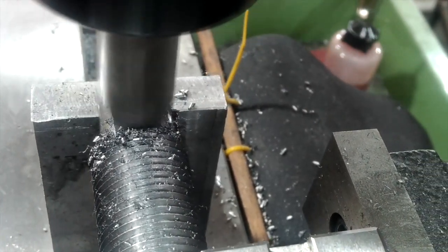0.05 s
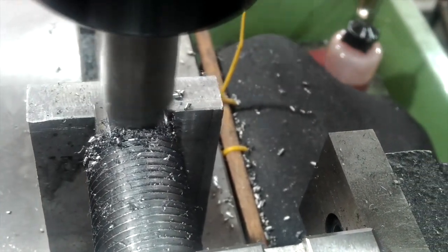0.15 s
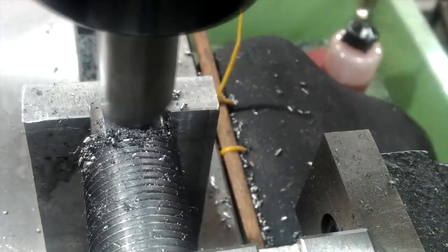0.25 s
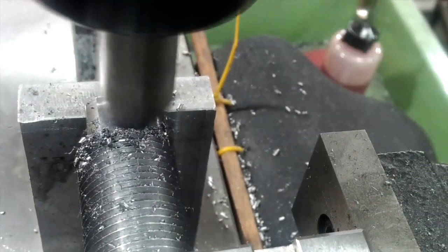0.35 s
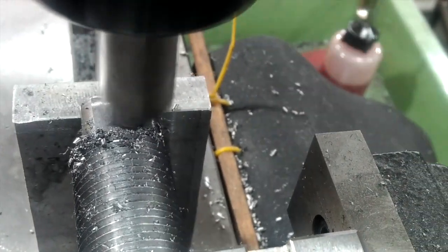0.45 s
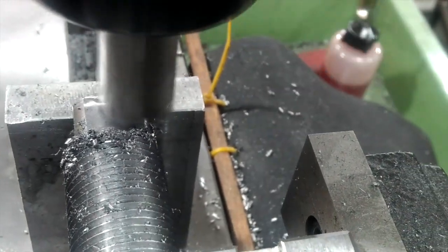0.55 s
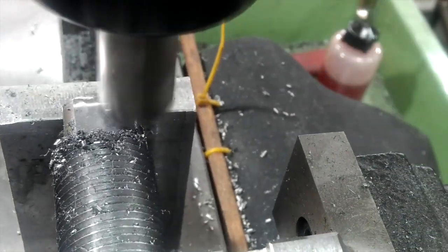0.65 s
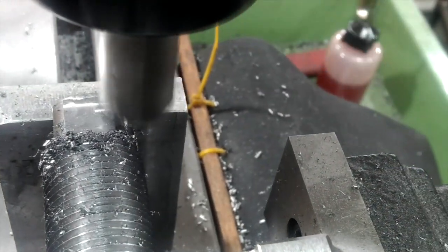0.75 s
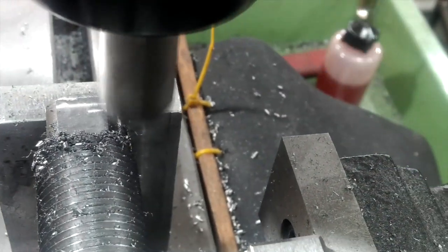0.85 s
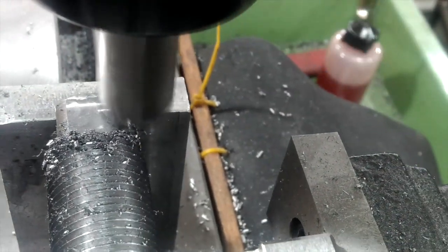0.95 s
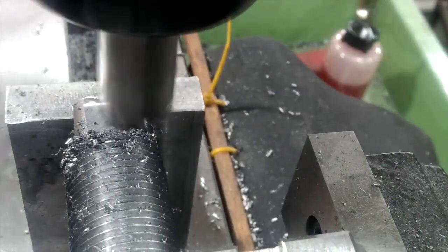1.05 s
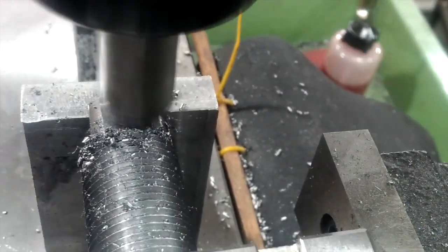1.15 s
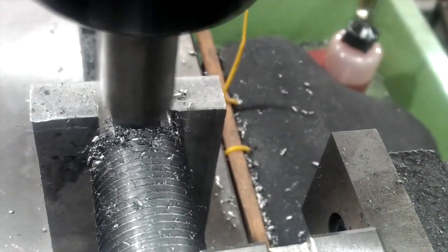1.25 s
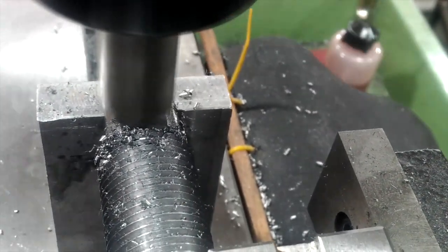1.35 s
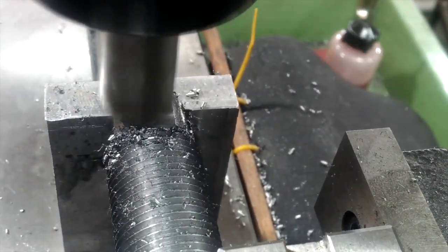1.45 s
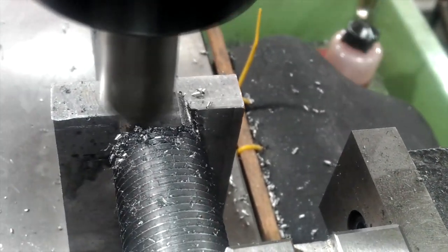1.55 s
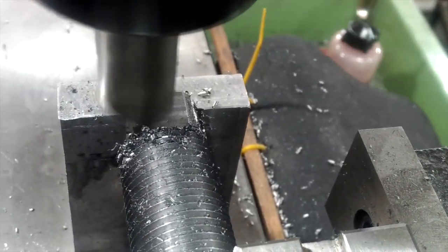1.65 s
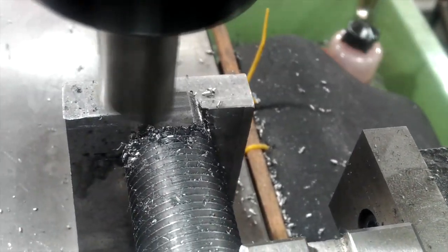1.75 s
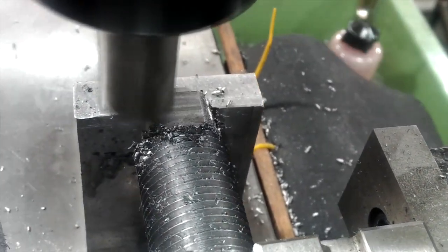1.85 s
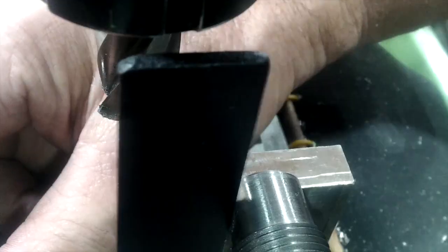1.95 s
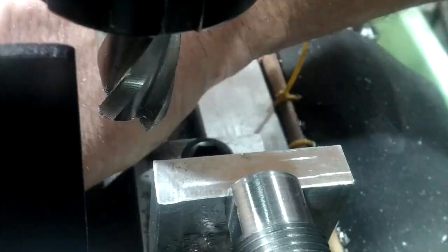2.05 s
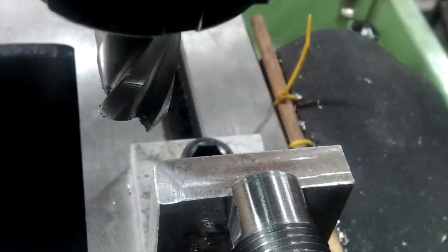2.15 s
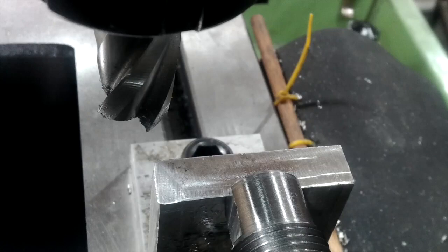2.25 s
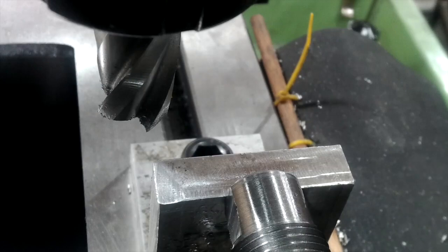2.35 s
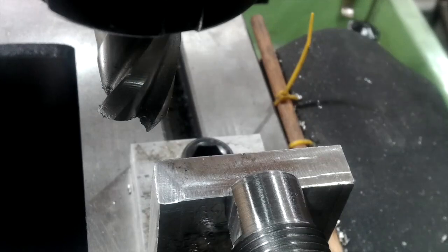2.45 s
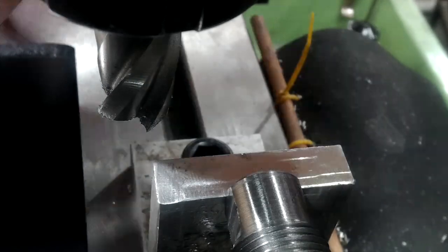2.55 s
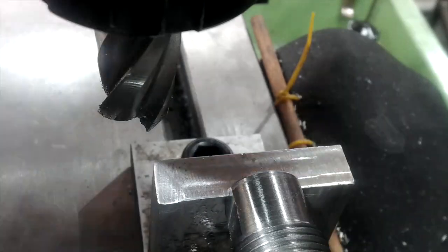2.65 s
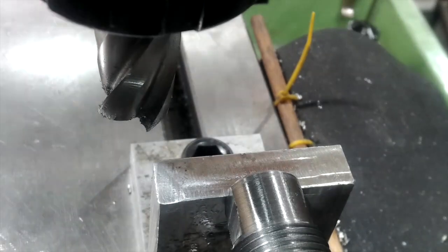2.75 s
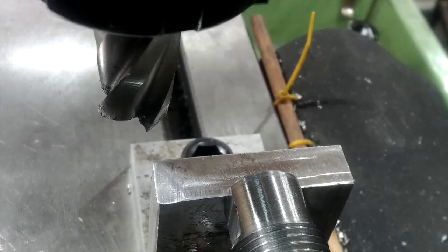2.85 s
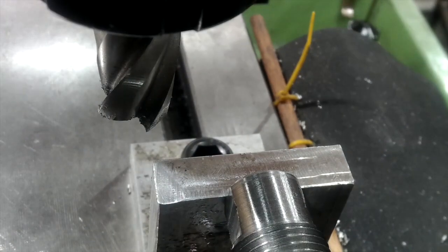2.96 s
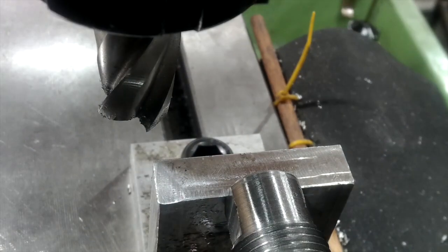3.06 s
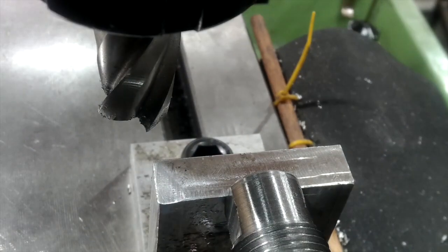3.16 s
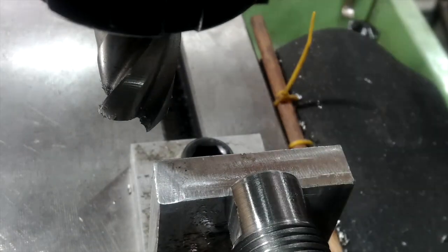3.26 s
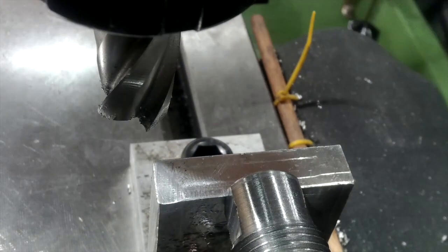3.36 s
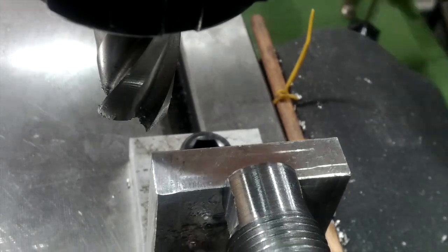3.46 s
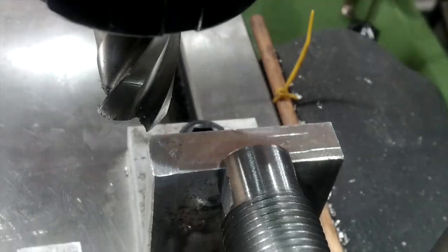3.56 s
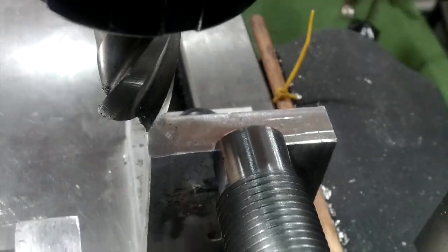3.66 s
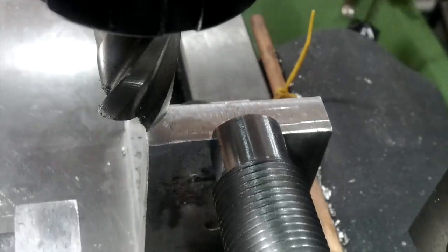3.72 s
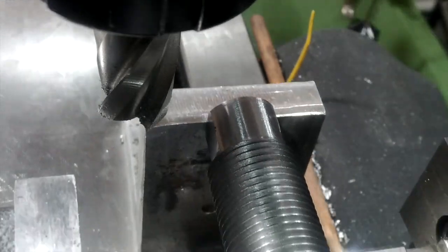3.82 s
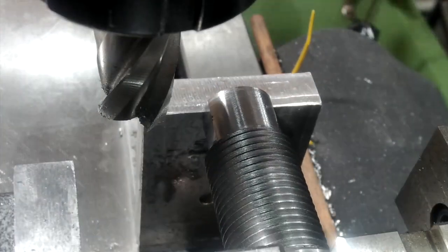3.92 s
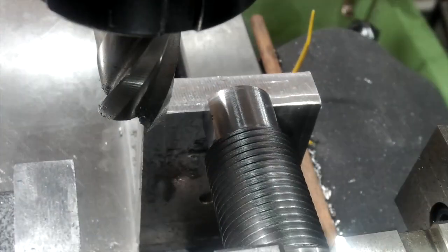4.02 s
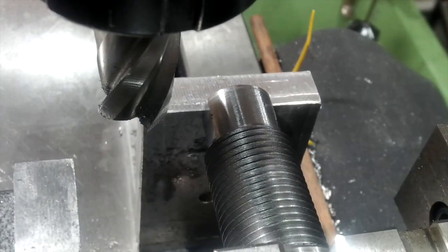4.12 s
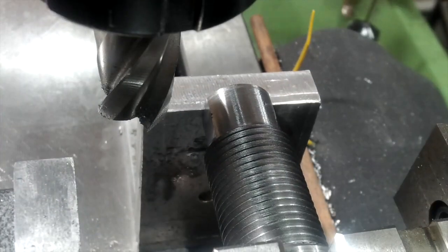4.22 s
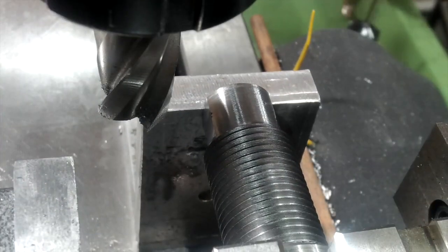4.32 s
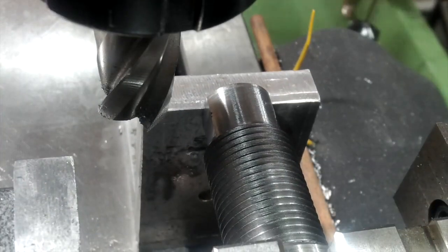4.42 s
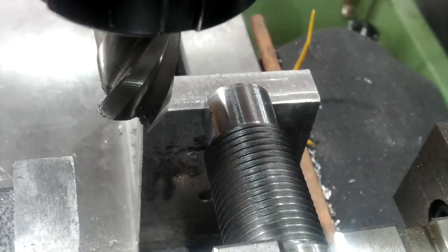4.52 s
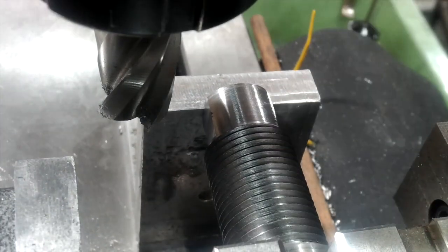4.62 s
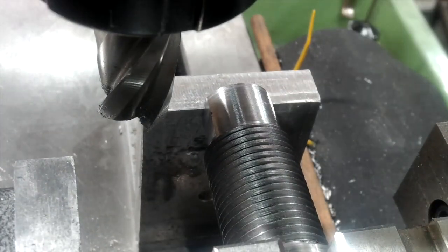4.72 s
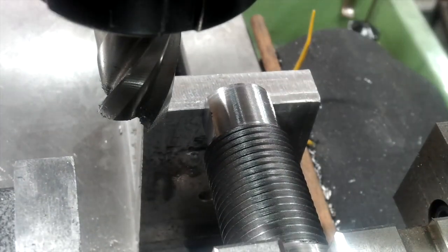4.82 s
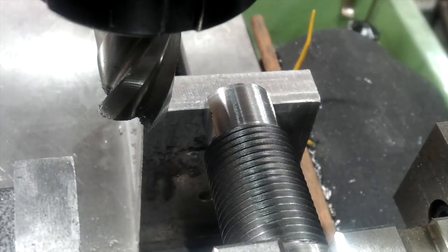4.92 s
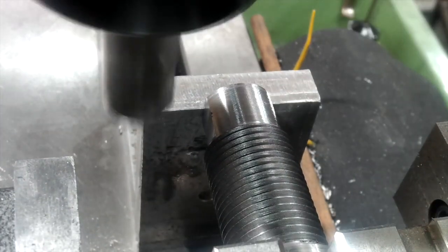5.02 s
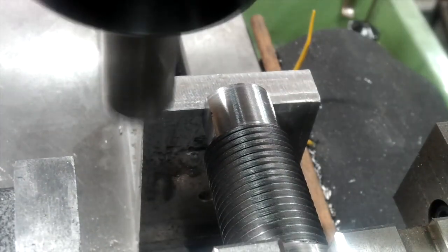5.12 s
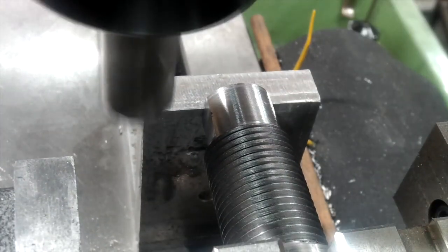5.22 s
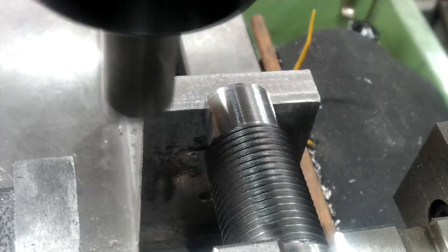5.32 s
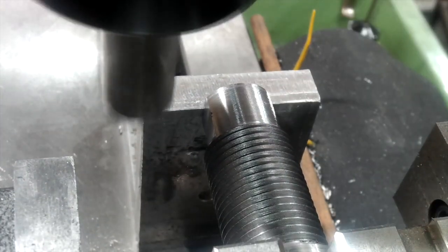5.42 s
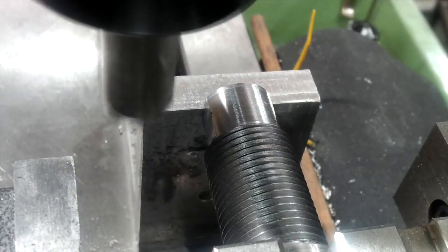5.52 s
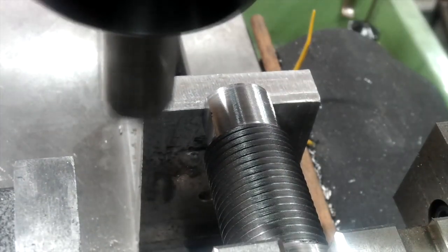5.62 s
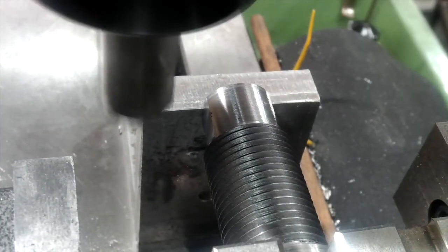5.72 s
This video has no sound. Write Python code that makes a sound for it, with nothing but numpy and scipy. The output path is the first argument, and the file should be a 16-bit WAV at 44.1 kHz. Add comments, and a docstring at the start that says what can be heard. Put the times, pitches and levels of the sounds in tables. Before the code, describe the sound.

Close workshop milling: hissing, buzzing cut over a steady hum, sudden drop to idle hum, gritty jog clicks, sharp switch snap, spindle running free.

```python
"""In a workshop, a small milling machine is heard close by. Rotating parts and the hum are sums of sines; the spindle
adds resonant noise, and the end mill takes two bites of metal as flute harmonics and grains of chip noise.
At 2 s every steady tone drops abruptly by a tenth, the spindle stands, and the cabinet hums over the shop's hiss.
The table is jogged in steps of filtered grains; a switch clacks and a contactor pulls in, both as struck decaying
modes; then the spindle runs again in air."""
import sys
import numpy as np
from scipy import signal
from scipy.fft import rfft, irfft
from scipy.io import wavfile
from scipy.ndimage import uniform_filter1d

SR = 44100
rng = np.random.default_rng(int(sys.argv[2]) if len(sys.argv) > 2 else 0)


def bounce(signal):
    """Save signal as a 16-bit WAV file at the path given by the first command-line argument."""
    frames = np.transpose(np.atleast_2d(signal))
    limited = np.clip(frames, -1, 1)
    pcm = np.round(limited * 32767).astype(np.int16)
    wavfile.write(sys.argv[1], SR, pcm)


N = 255019

CHANGE_S, START_S = 2.0015, 5.009   # the abrupt change; the spindle restarts
EARLY_PACE = 1.1083   # rate of machine time before the change; 1 afterwards
T = np.arange(N) / SR
EARLY, LATE = T < CHANGE_S, T >= START_S
PACE = np.where(EARLY, EARLY_PACE, 1)
CLOCK = np.cumsum(PACE) / SR   # machine time, s
HUM_HZ, FLUTE_HZ, FAN_HZ = 361.96, 69.31, 161.5   # fundamentals in machine time

# Shop hiss: f/Hz, spectral density/dB (relative)
SHOP_SPECTRUM = [(25, -21), (60, -26), (110, -5), (170, -3.5), (250, -4), (450, 0), (600, -8.5), (1000, -5),
                 (1700, -10), (2800, -8), (5500, -10.5), (8000, -10.5), (13000, -13.5), (15500, -19)]
# Faint humps in the hiss: f/Hz, width/Hz, lift/dB
SHOP_HUMPS = [(1920, 62, 9.5), (2930, 28, 14.5), (3920, 230, 3), (4940, 98, 9), (6500, 2100, 6.5)]
SHOP_DB = -72.5   # rms
# Swells of the bench rumble: t/s, level/dB
RUMBLE_SWELLS = [(.13, -86), (.38, -77), (3.19, -81), (3.43, -79), (3.68, -92), (3.87, -91)]
RUMBLE_EARLY_DB, RUMBLE_DB = -86.5, -91.5   # before and after the change
SWELL_S = 0.043   # time from the peak of a swell to 1/e

# Cabinet hum: multiple of HUM_HZ, then level/dB while milling, with spindle at rest, after restart
HUM_HARMONICS = [(1, -45.5, -48, -48), (2, -55.5, -61, -58.5), (3, -78, -92.5, -84.5), (4, -66.5, -73, -75),
                 (5, -73, -84.5, -80), (6, -59.5, -83, -66), (7, -70.5, -77.5, -78), (8, -65, -83, -71.5),
                 (9, -66, -88.5, -78), (11, -68, -84.5, -80), (12, -64, -91, -81), (13, -68, -89, -72.5),
                 (14, -56.5, -96, -69.5)]
# Low fan-like tone: multiple of FAN_HZ, level/dB
FAN_HARMONICS = [(1, -86.5), (3, -85)]

# Small knocks and ticks about the machine: t/s, level/dB, low f/Hz, high f/Hz
TICKS = [(.29, -59, 200, 400), (.355, -54, 400, 660), (.386, -60.5, 120, 400), (2.075, -70, 8500, 13000),
         (2.461, -68, 8500, 13000), (2.72, -69, 3000, 9000), (2.845, -70, 400, 650),
         (2.9, -61.5, 1000, 1350), (2.931, -59, 950, 3500), (3.04, -72, 1000, 1300),
         (3.106, -63, 2500, 7000), (3.156, -70, 500, 1300), (3.165, -72, 80, 300), (3.236, -68, 900, 3000),
         (3.3, -70, 950, 1350), (3.379, -62, 100, 600), (3.443, -58.5, 120, 1400),
         (3.455, -63, 5000, 13000), (3.465, -58.5, 990, 1390), (3.96, -62, 1400, 1900),
         (4.662, -63, 950, 7000), (4.72, -55.5, 1200, 9000), (5.418, -45, 3500, 13000),
         (5.558, -60, 10000, 14500), (5.6, -56, 6300, 10000)]
TICK_T60_S, TICK_CYCLES = 0.036, 9.2   # base decay; added decay as cycles of the bandwidth

# Ways rubbing through the move: f/Hz, spectral density/dB (relative)
SLIDE_SPECTRUM = [(600, -23), (1100, -2), (1600, -2), (3000, 0.5), (5000, -1.5), (7500, -3), (9000, -15),
                  (12000, -12), (15000, -22)]
SLIDE_FROM_S, SLIDE_TO_S, SLIDE_DB = 3.445, 3.985, -69.5
GRIT_PER_S, GRIT_MAX_DB = 25, -64   # fine ticks while sliding

# Jog steps of the table: t/s, level/dB at the start of the step
JOG_STEPS = [(3.549, -54), (3.608, -55), (3.662, -53.5), (3.713, -55.5), (3.773, -53), (3.823, -51.5),
             (3.877, -52), (3.932, -57.5)]
# Resonances of the table: f/Hz, width/Hz, level/dB
JOG_RESONANCES = [(1145, 60, -12.5), (2610, 130, -11), (2950, 270, 0), (3720, 110, -6), (5000, 330, 3.5),
                  (5500, 140, 1.5), (6240, 150, -8), (6720, 170, -1), (7270, 250, -5)]
JOG_S = 0.03   # nominal length of a step
JOG_DETUNE, JOG_FLARE_DB = .025, 5   # spread of relative detuning per step; spread of flare within it

# Switch, blow and bounces: t/s, level/dB
SWITCH_BLOWS = [(4.8093, -29.5), (4.8097, -27), (4.8135, -30)]
# Dying run of switch touches: start t/s, gap/s, first level/dB, change per touch/dB
SWITCH_CHATTER = (4.8108, .0012, -36, -1.14)
# Modes of the switch: f/Hz, level/dB, t60/s
SWITCH_MODES = [(240, -42, 0.01), (700, -48, .01), (1180, -19, 0.0096), (1740, -10, 0.0078),
                (2210, -6.5, 0.0049), (3140, -32, 0.0027), (4360, -9, 0.0091), (4560, -4.5, 0.0092),
                (5540, -5.5, 0.0075), (6740, -4, 0.01), (7000, -9, .007), (7860, -11, 0.011),
                (10300, -28, .005), (12600, -17, 0.0036), (14300, -25, .004)]
# Contactor touches: t/s, level/dB
CONTACTOR_BLOWS = [(5.0085, -58), (5.0097, -52), (5.0126, -48), (5.0198, -52), (5.024, -44)]
# Dying run of contactor touches: start t/s, gap/s, first level/dB, change per touch/dB
CONTACTOR_CHATTER = (5.0262, .003, -58, -2.5)
# Modes of the contactor: f/Hz, level/dB, t60/s
CONTACTOR_MODES = [(670, -21.5, .04), (1160, -37, 0.013), (2280, -9.5, 0.02), (3020, -6, 0.019),
                   (3740, -3, 0.014), (4600, -4.5, 0.0095), (5206, -6, .01), (6560, -3, 0.0086),
                   (8100, -3, 0.0051), (10500, -6, 0.01), (13000, -8, .008)]
# Low thud through the frame after the switch, two pings of the seating armature:
# t/s, f/Hz, level/dB, swell/s, t60/s
PINGS = [(4.811, 102.6, -72.5, .03, 0.98), (5.0106, 4720, -25, 0.00036, 0.0045),
         (5.0126, 5160, -19.5, 0.0013, 0.012)]

# Whine of spindle motor and bearings: f/Hz in machine time, level/dB while milling, level/dB after restart
WHINE = [(654, -75, -76), (794, -90, -82), (1597, -77, -85), (1735, -70, -75), (1803, -69, -73),
         (1862, -66, -73), (1887, -68, -72), (1903, -67, -72), (2011, -67, -95), (2292, -69, -88),
         (2320, -69, -76), (2352, -70, -86), (2522, -64, -72), (2702, -72, -80), (2965, -64, -74),
         (3246, -68, -80), (3331, -68, -76), (3472, -62, -74), (3690, -66, -76), (4860, -72, -76),
         (4888, -66, -75), (5000, -66, -73), (5041, -56, -65), (5401, -57, -69), (6121, -72, -78),
         (6664, -71, -78), (6845, -62, -71), (6944, -67, -78), (7574, -66, -80), (8297, -62, -84),
         (9022, -65, -79), (10090, -60, -79), (10376, -66, -77), (10415, -66, -75), (10812, -67, -78),
         (11219, -72, -96), (12154, -67, -82), (12921, -77, -81), (13250, -76, -95), (13889, -79, -82)]
# Spindle rush while milling: f/Hz, spectral density/dB (relative)
RUSH_EARLY = [(530, -66), (900, -53), (1510, -9), (1580, -16), (1700, -16), (2030, -8), (2350, -6.5),
              (2980, -9), (3290, -2.5), (5060, -3), (5770, -0.5), (6280, -10), (8070, -0.5), (11600, -4.5),
              (15800, -9)]
# Spindle rush after restart: f/Hz, spectral density/dB (relative)
RUSH_LATE = [(530, -37), (900, -12), (1350, -14.5), (1420, -9), (1640, -12), (1850, -4), (2010, -7),
             (2130, -4.5), (2680, -3), (4130, -2), (5060, -1), (5840, -4), (13400, -5.5), (14900, -16),
             (15800, -55)]
RUSH_EARLY_DB, RUSH_LATE_DB = -49, -58
# Resonances of the spindle head, scaled by the pace: f/Hz, width/Hz, lift/dB
HEAD_RESONANCES = [(1870, 220, 2), (2300, 280, 4), (3000, 270, 8), (3730, 450, 5.5), (5180, 340, 7.5),
                   (6800, 210, -3), (10420, 450, 8.5), (12800, 600, 2)]

# Flute beat; unequal bites of alternate flutes add half multiples: multiple of FLUTE_HZ, level/dB (relative)
FLUTE_HARMONICS = [(2, -23), (4, -12), (6, -14), (7, -11), (8, -10), (9, -2), (9.5, -6), (10, -7), (11, -1),
                   (12, -5), (12.5, -10), (13, -14), (14, -10), (14.5, -8), (15, -9), (16, -7), (17, -5),
                   (18, -12), (19, -9), (19.5, -6), (20, -6), (22, -15), (23, -10), (25, -6), (27, -6),
                   (32, -8), (32.5, -3), (33, -3), (34, -6)]
# Chips tearing off: f/Hz, spectral density/dB (relative)
CHIP_SPECTRUM = [(150, -28.5), (500, -16), (1200, -16), (2200, -12.5), (3800, -5), (4800, -5.5),
                 (6000, -4.5), (7300, -2.5), (8200, -18.5), (11500, -3.5), (15000, -19.5)]
# Tool and work ringing under the cut: f/Hz, width/Hz, lift/dB
TOOL_RESONANCES = [(2483, 150, 9), (3430, 130, 6), (5460, 126, 13.5), (6485, 126, 12.5), (7000, 110, 9)]
# Bites of the cutter: start t/s, end t/s, low flute level/dB, high flute level/dB, chip level/dB
BITES = [(-.05, 0.508, -61, -61.5, -45), (1.232, 1.46, -72, -62.5, -50)]
BITE_ATTACK_S, CHIP_ATTACK_S, BITE_RELEASE_S, BITE_SAG_DB_PER_S = .04, 0.31, 0.16, -10
SKIM_LOW_DB, SKIM_HIGH_DB, SKIM_CHIP_DB = -80.5, -86, -58   # between bites the flutes only skim
ENTRY, CHIPS_PER_S = .59, 5000   # share of a pass done at time zero; grains of swarf

STOPBAND_HZ = 16120


def from_db(db):
    """Logarithmic level: decibels to amplitude gain."""
    return 10 ** (np.asarray(db) / 20)


def rms_one(x):
    """Normalisation of mean power: scale to rms 1."""
    return x / np.sqrt(np.mean(x ** 2) + 1e-20)


def drift(rate):
    """Low-pass random process: slow chance of spread 1, changing about rate times a second."""
    # worked out at every 40th sample, after a run-in of 2000 points
    pole = np.exp(-80 * np.pi * rate / SR)
    white = rng.standard_normal(N // 40 + 2002)
    slow = signal.lfilter([1], [1, -2 * pole, pole * pole], white)[2000:]
    return np.interp(np.arange(N) / 40, np.arange(len(slow)), rms_one(slow - slow.mean()))


def coloured(x, spectrum, lifts=(), pace=1):
    """Spectral shaping: a smooth spectrum with resonant lifts filters x; rms 1."""
    hz = np.maximum(np.fft.rfftfreq(N, 1 / SR), 1)
    points = np.array(spectrum)
    level_db = np.interp(np.log(hz), np.log(points[:, 0]), points[:, 1])
    for centre, width, lift_db in lifts:
        level_db += lift_db / (1 + (2 * (hz / pace - centre) / width) ** 2)
    return rms_one(irfft(rfft(x) * from_db(level_db), N))


def ring(clicks, hz, t60):
    """Damped oscillator: a unit click excites a decaying sine of initial amplitude 1."""
    decay, w = from_db(-60 / (t60 * SR)), 2 * np.pi * hz / SR
    return signal.lfilter([0, np.sin(w)], [1, -2 * decay * np.cos(w), decay * decay], clicks + 1e-18)


def tone(hz, phase=0):
    """Simple harmonic motion: a sine of rms 1 on machine time."""
    return np.sqrt(2) * np.sin(2 * np.pi * hz * CLOCK + phase)


def puff(level_db, low_hz, high_hz, t60, size=4000):
    """Exponential decay: band-limited noise that dies away from its onset."""
    band = signal.butter(2, [low_hz, high_hz], "band", fs=SR, output="sos")
    white = rng.standard_normal(size)
    dying = from_db(level_db - 60 * np.arange(size) / SR / t60)
    return signal.sosfilt(band, white * dying) / np.std(signal.sosfilt(band, white))


def background():
    """Stationary noise: shop hiss, over a low bench rumble that swells briefly."""
    hiss = coloured(rng.standard_normal(N), SHOP_SPECTRUM, SHOP_HUMPS)
    band = signal.butter(2, [35, 125], "band", fs=SR, output="sos")
    rumble = rms_one(signal.sosfilt(band, rng.standard_normal(N)))
    level = from_db(np.where(EARLY, RUMBLE_EARLY_DB, RUMBLE_DB))
    for s, db in RUMBLE_SWELLS:
        level = level + from_db(db) * np.exp(-((T - s) / SWELL_S) ** 2)
    return from_db(SHOP_DB) * hiss + level * rumble


def hum():
    """Fourier series: hum harmonics change level with the spindle's state, beside a fan-like tone."""
    hz = HUM_HZ * (1 + 0.000089 * drift(0.6))
    phase = 2 * np.pi * np.cumsum(hz * PACE) / SR
    out = sum(from_db(db) * tone(k * FAN_HZ) for k, db in FAN_HARMONICS)
    for k, early_db, rest_db, late_db in HUM_HARMONICS:
        level_db = np.select([EARLY, LATE], [early_db, late_db], rest_db)
        out = out + from_db(level_db) * np.sqrt(2) * np.sin(k * phase)
    return out


def ticks():
    """Bandwidth and duration are reciprocal: each tick is a noise puff, and narrow ones last longer."""
    out = np.zeros(N)
    for s, db, low_hz, high_hz in TICKS:
        t60 = TICK_T60_S + TICK_CYCLES / (high_hz - low_hz)
        sound = puff(db, low_hz, high_hz, t60)
        out[int(s * SR):][:len(sound)] += sound
    return out


def sliding(edge_s=.015, patchy_db=2.0):
    """Dry friction: grains of contact noise under the whole move, with fine ticks at random."""
    shape = np.clip(np.minimum(T - SLIDE_FROM_S, SLIDE_TO_S - T) / edge_s, 0, 1)
    grains = rng.standard_normal(N) * (rng.random(N) < 3000 / SR)   # 3000 grains per second
    out = from_db(SLIDE_DB + patchy_db * drift(36)) * shape * coloured(grains, SLIDE_SPECTRUM)
    length_s = SLIDE_TO_S - SLIDE_FROM_S
    for place, weakness in rng.random((int(GRIT_PER_S * length_s), 2)):
        sound = puff(GRIT_MAX_DB - 8 * weakness, 11300, 13560, .02)
        out[int((SLIDE_FROM_S + place * length_s) * SR):][:len(sound)] += sound
    return out


def jogging(rise_s=0.0044, fall_s=0.008, sag_db=-6.0, wash_db=-11.0, sharp=2.1, size=4000, run_in=1000):
    """Resonance under random impacts: gritty buzzes flare unevenly in table modes and sag."""
    out = np.zeros(N)
    age = (np.arange(size) - run_in) / SR   # the resonances build up before the step is heard
    edges = np.clip(np.minimum(age / rise_s, (JOG_S - age) / fall_s + .5), 0, 1)
    band = signal.butter(2, [1400, 8500], "band", fs=SR, output="sos")
    for s, db in JOG_STEPS:
        # a dense rattle of tiny contacts, 1800 per second
        contacts = rng.standard_normal(size) * (rng.random(size) < 1800 / SR)
        rings = 0
        for hz, width, ring_db in JOG_RESONANCES:
            hz = hz * (1 + JOG_DETUNE * rng.standard_normal())
            t60 = sharp / width
            narrow = ring(ring(contacts, hz, t60), hz, t60)   # twice: dark valleys between the resonances
            flare = np.interp(np.arange(size), np.linspace(0, size, 12), rng.standard_normal(12))
            rings = rings + from_db(ring_db + JOG_FLARE_DB * flare) * rms_one(narrow)
        wash = rms_one(signal.sosfilt(band, contacts))
        buzz = rms_one(rms_one(rings) + from_db(wash_db) * wash)
        out[int(s * SR) - run_in:][:size] += from_db(db + sag_db * age / JOG_S) * edges * buzz
    return out


def chatter(start_s, gap_s, db, step_db, count):
    """Energy loss at impact: unevenly spaced touches, each weaker than the last."""
    return [(start_s + gap_s * (k + rng.uniform(-.5, .5)), db + step_db * k) for k in range(count)]


def struck(blows, modes, spread_db, rattle_db, rattle_s, size=30000):
    """Modal excitation: blows strike each mode unequally, and loose parts rattle the modes briefly."""
    s, blow_db = np.transpose(blows)
    first = int(s.min() * SR)
    at = (s * SR).astype(int) - first
    starts = np.zeros(size)
    starts[at] = from_db(blow_db + rattle_db)
    loose = signal.lfilter([1], [1, -from_db(-60 / (rattle_s * SR))], starts + 1e-18)
    out = np.zeros(N)
    for hz, level_db, t60 in modes:
        clicks = loose * rng.standard_normal(size) * (hz > 500)   # the rattle spares the low modes
        clicks[at] = from_db(blow_db + spread_db * rng.standard_normal(len(s)))
        out[first:first + size] += from_db(level_db) * ring(clicks, hz, t60)
    return out


def switch():
    """Contact bounce: a switch's blows run into a dying chatter that rings its modes."""
    blows = SWITCH_BLOWS + chatter(*SWITCH_CHATTER, count=12)
    return struck(blows, SWITCH_MODES, spread_db=3, rattle_db=-19.0, rattle_s=0.01)


def contactor():
    """Contact bounce: the contactor's touches run into a dying chatter that rings its modes."""
    blows = CONTACTOR_BLOWS + chatter(*CONTACTOR_CHATTER, count=5)
    return struck(blows, CONTACTOR_MODES, spread_db=5.5, rattle_db=-11.0, rattle_s=0.02)


def pings(size=30000):
    """Brief driving of a single mode: its amplitude swells linearly, then dies exponentially."""
    out, age = np.zeros(N), np.arange(size) / SR
    for s, hz, db, swell_s, t60 in PINGS:
        swell = np.minimum(age / swell_s, 1)
        dying = from_db(db - 60 * np.maximum(age - swell_s, 0) / t60)
        out[int(s * SR):][:size] += dying * swell * np.sin(2 * np.pi * hz * age)
    return out


def spindle(waver_db=1.5, wander_rad=0.17):
    """Random modulation and resonance: wavering narrow tones over a noise rush that rings in the head."""
    out = np.zeros(N)
    for hz, early_db, late_db in WHINE:
        level = from_db(early_db) * EARLY + from_db(late_db) * LATE
        phase = wander_rad * drift(9.0) + rng.uniform(0, 2 * np.pi)
        out += level * from_db(waver_db * drift(26.0)) * tone(hz, phase)
    early = coloured(rng.standard_normal(N), RUSH_EARLY, HEAD_RESONANCES, EARLY_PACE)
    late = coloured(rng.standard_normal(N), RUSH_LATE, HEAD_RESONANCES)
    rush = from_db(RUSH_EARLY_DB) * EARLY * early + from_db(RUSH_LATE_DB) * LATE * late
    return out + rush * from_db(.6 * drift(25))


def bites(column, skim_db, attack_s):
    """Power addition: one layer of the cut rises into each bite, sags and dies to the skimming level."""
    power = from_db(2 * skim_db)
    for row in BITES:
        start_s, end_s = row[:2]
        # the rise is complete at the start; the release begins at the end
        rise, fall = (T - start_s) / attack_s + 1, (end_s - T) / BITE_RELEASE_S + 1
        edges = np.clip(np.minimum(rise, fall), 0, 1)
        level = from_db(row[column] + BITE_SAG_DB_PER_S * (T - start_s))
        power = power + (edges ** 2 * level) ** 2
    return np.sqrt(power)


def cutting(waver_db=2.5, scatter_rad=0.81, fade_db=8.0, uneven_db=2.5):
    """Periodic forcing: flute passes sound harmonics and gate bursts of chip grains, never two alike."""
    low = bites(column=2, skim_db=SKIM_LOW_DB, attack_s=BITE_ATTACK_S)
    high = bites(column=3, skim_db=SKIM_HIGH_DB, attack_s=BITE_ATTACK_S)
    chip_level = bites(column=4, skim_db=SKIM_CHIP_DB, attack_s=CHIP_ATTACK_S)
    beat = np.zeros(N)
    for k, db in FLUTE_HARMONICS:
        level = low if k < 15 else high
        phase = 2 * np.pi * k * ENTRY + scatter_rad * rng.standard_normal()
        beat += level * from_db(db + waver_db * drift(9.9)) * tone(k * FLUTE_HZ, phase)
    passes = FLUTE_HZ * CLOCK + ENTRY   # a flute enters at each whole number
    bite_db = uneven_db * rng.uniform(-0.9, 1, int(passes[-1]) + 1)[passes.astype(int)]
    # the burst sets in sharply as the flute enters and fades through the pass
    gate = uniform_filter1d(from_db(bite_db - fade_db * (passes % 1)), size=40)
    grains = rng.standard_normal(N) * (rng.random(N) < CHIPS_PER_S / SR)
    chips = coloured(grains * gate * EARLY, CHIP_SPECTRUM, TOOL_RESONANCES)
    return EARLY * (beat + chip_level * chips)


def scene():
    """Superposition: all sources add at one microphone, copied to both channels."""
    mono = background() + hum() + ticks() + sliding() + jogging() + pings() + spindle() + cutting()
    # the switch and contactor clacks carry no deep bass
    high_pass = signal.butter(2, 200, "high", fs=SR, output="sos")
    mono += signal.sosfilt(high_pass, switch() + contactor())
    return np.stack([mono, mono])


def record(dry):
    """Band limitation: a steep low-pass puts everything above the stopband edge 60 dB down."""
    return signal.sosfilt(signal.cheby2(12, 60, STOPBAND_HZ, fs=SR, output="sos"), dry)


dry = scene()
out = record(dry)
bounce(out)
```